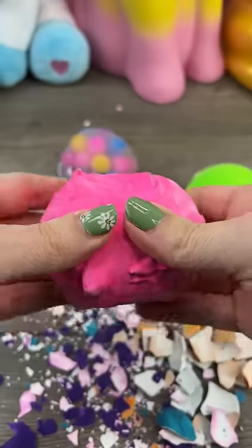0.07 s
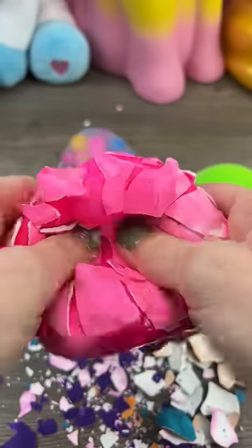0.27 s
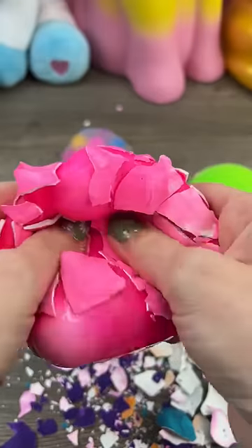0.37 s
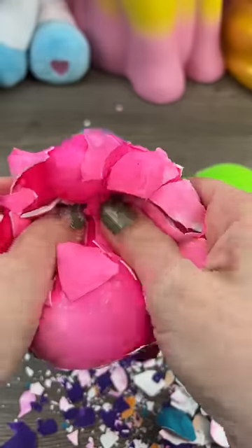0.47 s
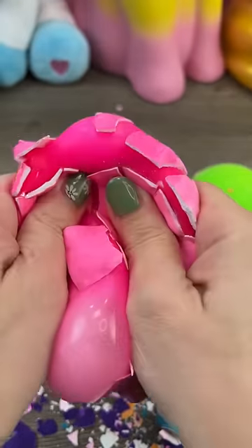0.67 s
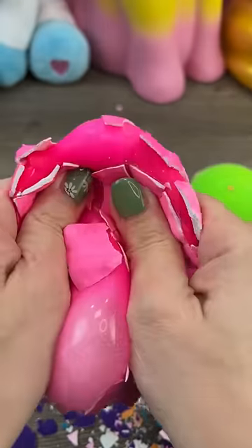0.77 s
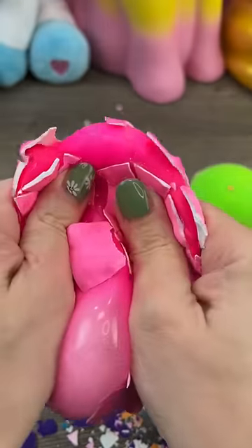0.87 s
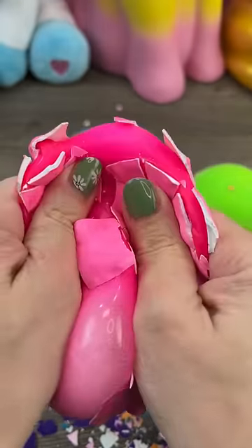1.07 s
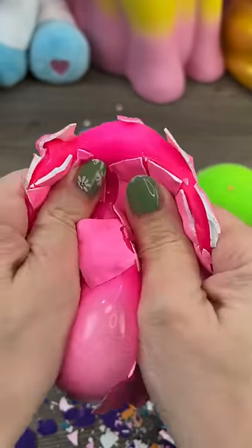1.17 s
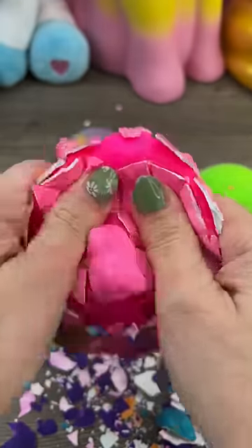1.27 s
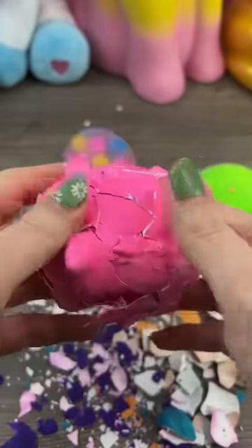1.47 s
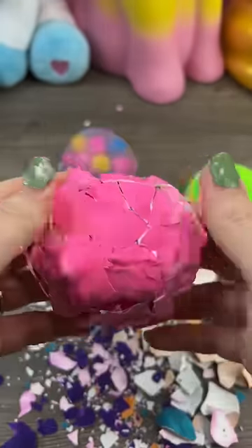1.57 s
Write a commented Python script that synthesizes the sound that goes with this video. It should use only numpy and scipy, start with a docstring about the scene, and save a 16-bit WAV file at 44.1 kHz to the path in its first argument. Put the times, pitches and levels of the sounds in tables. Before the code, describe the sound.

A brittle plaster shell is squeezed by hand, very close, in stereo. Faint snaps begin before 0.2 s; at about 0.24 s a loud, overloaded crack lands with a short hollow pop. Two tiny creaks follow at 0.3-0.4 s, then dense dry snaps and crunches from 0.45 to 0.95 s. It nearly hushes until 1.2 s, then soft rustling and a few lighter crackles, over faint low room rumble.

```python
"""Over a low room rumble and a changing rustle of flakes and fingers, a brittle plaster shell on a soft ball
is squeezed close to two microphones. Faint snaps lead to one loud crack and a hollow pop, then two creaks,
then many short snaps and ticks. Fractures and ticks are shaped noise that excites damped resonators,
the pop is a sum of damped sines, the rustle is noise gated by random grains, and the rumble is narrow-band
noise; a short noise tail adds the room's reverberation."""
import sys
import numpy as np
from scipy import signal
from scipy.io import wavfile

SR = 44100
rng = np.random.default_rng(int(sys.argv[2]) if len(sys.argv) > 2 else 0)


def to_wav(s):
    """Save 16-bit WAV."""
    ch = np.atleast_2d(s).T  # columns
    pcm = np.round(np.clip(ch, -1, 1) * 32767)  # PCM
    wavfile.write(sys.argv[1], SR, pcm.astype(np.int16))


N = 70560   # length of the scene in samples

BURST = 4096   # samples set aside for one fracture or tick
ALIKE = 0.75   # share of noise power common to both microphones
RUMBLE_SIDE, RUMBLE_LAG = 0.25, 0.3   # amplitude of each side's own noise; right phase lag (radians)
AIR_HZ = (7500, 16000)   # band of the treble hiss
FLAKE_HZ, FLAKE_CYCLES = (1300, 8300), 7.6   # range of flake pitches; t60 in cycles
GRAINS_PER_S, GRAIN_SPREAD_DB = 2800, 4.2   # rate of all flake sizes together; scale of random level excess
GRAIN_BED = 0.33   # amount of smooth hiss between grains
LEAD_S = 0.01   # the noise burst starts this long before the listed time and swells to its crest
RISE_SHARE, FALL_SHARE = 0.17, 0.47   # growth and decay time against the length of a fracture
SHARD_CYCLES, SNAP_HZ = 8.5, (7000, 19000)   # t60 of a shard in cycles; band of the snap
BROAD_DB, KNOCK_T60_S = -4.5, 0.017   # broad noise against the mean of shard and snap levels; knock ring
CREAK_HZ = 4220   # pitch of the slips in a creak
TICK_S, TICK_CYCLES = 0.0006, 7.0   # swell and decay time of a tick; t60 of its ring in cycles
TICK_HISS_DB = 1.5   # hiss of a tick against its ring
ROOM_T60_S, ROOM_DB, ROOM_CUT_HZ = 0.097, -14, 9000   # decay, level and upper edge of the room's tail
LOW_CUT_HZ, CUTOFF_HZ = 44, 16600   # high-pass corner; stop-band edge of the final low-pass


def amp(db):
    """Level to amplitude: 20 dB is a factor of ten."""
    return 10 ** (np.asarray(db) / 20)


def rms_one(x):
    """Scale to unit effective (root-mean-square) value."""
    return x / np.sqrt(np.mean(x ** 2) + 1e-20)


def top_one(x):
    """Scale until the peaks of the channels average one."""
    return x / np.abs(x).max(axis=-1).mean()


def band(x, low_hz, high_hz):
    """Band-pass filtering: only the spectrum between two edges is kept."""
    return signal.sosfilt(signal.butter(2, [low_hz, high_hz], "band", fs=SR, output="sos"), x)


def ring(x, hz, t60):
    """Damped resonator: a unit click starts a decaying sine of initial height one."""
    radius = amp(-60 / (t60 * SR))
    w = 2 * np.pi * hz / SR
    return signal.lfilter([0, np.sin(w)], [1, -2 * radius * np.cos(w), radius * radius], x)


def peak(x, hz, width_hz, db):
    """Resonant equalization: a bell-shaped lift or cut around one frequency."""
    w, g = 2 * np.pi * hz / SR, amp(db / 2)
    q = np.sin(w) * width_hz / hz / 2
    return signal.lfilter([1 + q * g, -2 * np.cos(w), 1 - q * g], [1 + q / g, -2 * np.cos(w), 1 - q / g], x)


def turn(x, hz, width_hz):
    """All-pass dispersion: phase turns a full cycle around hz, delaying that band at equal level."""
    w = 2 * np.pi * hz / SR
    q = np.sin(w) * width_hz / hz / 2
    return signal.lfilter([1 - q, -2 * np.cos(w), 1 + q], [1 + q, -2 * np.cos(w), 1 - q], x)


def pair(size):
    """Partial coherence: two noises share part of their power."""
    both, left, right = rng.standard_normal((3, size))
    return np.sqrt(ALIKE) * both + np.sqrt(1 - ALIKE) * np.array([left, right])


def rumble():
    """Resonance of noise: each band is filtered twice and is mostly coherent between the sides."""
    # low resonances of the room: centre f/Hz, width of each filter pass/Hz, level/dB
    resonances = [(57.46, 17.6, -42), (94.6, 20, -51), (173.8, 17, -55.5), (120, 70, -55)]
    out = 0
    for hz, width_hz, db in resonances:
        common = rng.standard_normal(N + SR)
        noise = common + RUMBLE_SIDE * rng.standard_normal((2, N + SR))
        edges = hz - width_hz / 2, hz + width_hz / 2
        settled = band(band(noise, *edges), *edges)[:, SR:]   # skip the filters' build-up
        out = out + amp(db) * rms_one(settled)
    return np.real(signal.hilbert(out) * np.exp([[0], [-1j * RUMBLE_LAG]]))


def grains(per_s):
    """Random impacts: uneven puffs whose power decays by 1/e in about 0.75 ms, over a faint bed."""
    hits = rng.random(N) < per_s / SR
    sizes = hits * amp(GRAIN_SPREAD_DB * np.minimum(rng.exponential(1, N), 4))
    bed_power = GRAIN_BED ** 2 * per_s / GRAINS_PER_S
    return np.sqrt(signal.lfilter([1], [1, -.97], sizes ** 2 + bed_power))


def rustle():
    """Granular excitation: flakes of ten sizes ring, and the same grains gate treble and bass hiss."""
    # loudness of flakes and fingers, interpolated: t/s, flake level/dB, treble level/dB, bass level/dB
    rustle_levels = [(0, -79, -76, -86), (0.122, -55.5, -59, -55), (0.203, -66, -80, -68.5),
                     (0.252, -29, -61, -33.5), (0.385, -61.5, -51.5, -59.5), (0.408, -58, -57, -56),
                     (.56, -37, -42.5, -71), (.68, -48, -51, -59.5), (0.899, -44.5, -60, -54),
                     (0.999, -59.5, -80.5, -86), (1.093, -75, -102, -107), (1.217, -41.5, -42.5, -46),
                     (1.293, -41, -38.5, -38.5), (1.39, -51, -41.5, -46), (1.46, -54.5, -67, -68),
                     (1.518, -57.5, -50.5, -54.5), (1.6, -60, -60, -51)]
    s, *levels = np.transpose(rustle_levels)
    puffs = [grains(GRAINS_PER_S / 10) for _ in range(10)]
    flakes = 0
    for puff, hz in zip(puffs, np.geomspace(*FLAKE_HZ, 10)):
        flakes = flakes + rms_one(ring(puff * pair(N), hz, FLAKE_CYCLES / hz))
    gate = np.sqrt(np.sum(np.square(puffs), axis=0))
    treble = band(gate * pair(N), *AIR_HZ)
    bass = band(gate * pair(N), 220, 720)
    t = np.arange(N) / SR
    return sum(amp(np.interp(t, s, db)) * rms_one(x) for db, x in zip(levels, [flakes, treble, bass]))


def cracks():
    """Brittle fracture: a noise burst gives a bright snap, a ringing shard, broad noise and a dull knock."""
    # fractures: t/s, shard f/Hz, shard level/dB, treble snap level/dB, dull knock level/dB, length scale/ms
    fractures = [(0.048, 3650, -27.5, -15, -34, 5.1), (0.115, 2800, -26, -22, -34.5, 8.3),
                 (0.2217, 2400, -24, -11, -27.5, 1.74), (0.2401, 1850, -5.5, 2.5, -8.5, 6.5),
                 (0.4239, 1180, -22.5, -25, -39, 4.2), (0.4655, 1235, -13, -10.5, -53, 7.46),
                 (0.5347, 1620, -16.5, -1.5, -36, 1.9), (0.544, 2020, -6, -3.5, -30, 3),
                 (0.5917, 5800, -0.5, -6.5, -68, 4.4), (0.7086, 2610, -12, -11, -36, 3.7),
                 (0.7162, 6000, -7.5, -0.5, -28, 2.4), (0.7354, 3110, -13, -12, -51, 4),
                 (0.7585, 2010, -7, -4, -48, 2.3), (0.7852, 2660, -9.5, -10, -31, 2.04),
                 (0.7946, 838, -16, -23.5, -37.5, 4.5), (0.8299, 3850, 0, -7.5, -16, 1.52),
                 (0.8336, 2340, -7.5, -12, -28, 3.6), (0.882, 2235, -19.5, -10.5, -39, 8.9),
                 (0.891, 1754, -11, -13.5, -46, 2.7), (0.9094, 4080, -15, -5, -23, 0.46),
                 (0.947, 924, -17, -36, -37, 1.27), (1.0071, 698, -43, -32.5, -36, 3.0),
                 (1.2768, 2030, -28.5, -14.5, -45, 6.3), (1.2976, 700, -20, -23, -25, 4.34),
                 (1.4243, 4780, -16.5, -11.5, -39, 5.2), (1.452, 4300, -17, -5, -24.5, 6.4),
                 (1.5679, 2510, -62, -14.5, -35.5, 6.9)]
    # hollow tones of the ball: f/Hz
    hollow_hz = (260, 440, 790)
    out, t = np.zeros((2, N + BURST)), np.arange(BURST) / SR
    for s, hz, shard_db, snap_db, knock_db, ms in fractures:
        x = 1000 * (t - LEAD_S) / ms - .4   # time from the crest, in lengths
        shape = np.exp(np.where(x < 0, x / RISE_SHARE, -x / FALL_SHARE))
        burst, other = pair(BURST) * shape, pair(BURST) * shape
        shard = ring(burst, hz, SHARD_CYCLES / hz)
        snap = band(burst, *SNAP_HZ)
        broad = band(other, 1000, 7500)
        dull = band(burst, 220, 1300)
        knock = sum(rng.uniform(0.94, 1) * ring(dull, tone_hz, KNOCK_T60_S) for tone_hz in hollow_hz)
        sound = amp(shard_db) * top_one(shard) + amp(snap_db) * top_one(snap)
        sound += amp((shard_db + snap_db) / 2 + BROAD_DB) * top_one(broad)
        sound += amp(knock_db) * top_one(knock)
        i = int((s - LEAD_S) * SR)
        out[:, i:i + BURST] += sound
    return out[:, :N]


def ticks():
    """Impulse excitation: noise puffs ring briefly; stick-slip creaks are even trains of the same ticks."""
    # small flakes snap off: t/s, f/Hz, level/dB
    flake_snaps = [(0.1001, 9400, -25.5), (.122, 2900, -33.5), (0.141, 11300, -19.5), (0.15, 4470, -24),
                   (0.296, 11500, -23.5), (0.304, 2600, -26), (.3925, 11600, -26), (0.4227, 11600, -26.5),
                   (0.5116, 1370, -23), (.542, 7000, -10.5), (0.6365, 4630, -16), (.648, 11100, -28),
                   (.657, 2600, -19), (.6765, 1570, -22), (.692, 11500, -29), (0.748, 2200, -36),
                   (0.7536, 2340, -21), (0.8466, 2000, -21), (0.8619, 2300, -18), (.8695, 2310, -20),
                   (.880, 3240, -17.5), (0.927, 2200, -27), (.943, 1580, -23), (0.9797, 1840, -34),
                   (1.159, 3800, -35.5), (1.289, 1990, -17.5), (1.317, 4700, -21.5), (1.395, 1900, -34),
                   (1.449, 5000, -24), (1.4008, 2030, -30), (1.583, 11500, -25.5)]
    # a split creeps on in even slips: start t/s, end t/s, spacing/s, mean level reached at the end/dB
    creeps = [(.308, .3395, .0068, -29), (.349, .3825, .0045, -22)]
    slips = []
    for start, end, gap_s, db in creeps:
        for s in np.arange(end, start, -gap_s):
            swell_db = 6 * (s - end) / (end - start)   # louder towards the end
            slips.append((s, CREAK_HZ, db + swell_db + rng.normal(0, 2)))
    out, t = np.zeros((2, N + BURST)), np.arange(BURST) / SR
    for s, hz, db in flake_snaps + slips:
        puff = pair(BURST) * t / TICK_S * np.exp(-t / TICK_S)
        hiss = band(puff, 1500, AIR_HZ[1])
        sound = top_one(ring(puff, hz, TICK_CYCLES / hz)) + amp(TICK_HISS_DB) * top_one(hiss)
        i = int((s - 2 * TICK_S) * SR)
        out[:, i:i + BURST] += amp(db) * sound
    return out[:, :N]


def pop():
    """Damped free vibration: low tones of the ball start softly and decay exponentially."""
    # thumps of the ball, strongest as the shell gives way: start t/s, f/Hz, level/dB, t60/s
    thumps = [(0.115, 184, -20, 0.057), (0.17, 310, -22, 0.018), (0.2446, 421, 17.5, 0.01),
              (0.25, 132, 2.5, 0.023), (.252, 68.5, 3, 0.051), (.255, 785, -21.5, 0.075)]
    out = np.zeros(N)
    for s, hz, db, t60 in thumps:
        t = np.maximum(np.arange(N) / SR - s, 0)
        soft_start = 1 - np.exp(-t * hz)
        out += amp(db - 60 * t / t60) * soft_start * -np.sin(2 * np.pi * hz * t)
    return out


def room(x):
    """Diffuse reverberation: convolution with a decaying noise tail, its own for each side."""
    t = np.arange(SR // 2) / SR
    noise = band(rng.standard_normal((2, len(t))), 290, ROOM_CUT_HZ)
    tail = noise * amp(-60 * t / ROOM_T60_S) * (t > .003)   # silent for the first 3 ms
    tail = tail / np.sqrt(np.sum(tail ** 2) / 2)
    return amp(ROOM_DB) * signal.fftconvolve(x, tail, axes=1)[:, :N]


def scene():
    """Superposition: near sounds, coloured and dispersed on the right, add to their room and the rumble."""
    # the right microphone hears brighter: centre f/Hz, width/Hz, lift/dB
    right_lift = (3214, 2250, 7.5)
    # phase turns of the right microphone: centre f/Hz, width/Hz
    right_phase = [(3600, 4570), (9000, 5400), (13000, 3300)]
    left, right = rustle() + cracks() + ticks()
    right = peak(right, *right_lift)
    for hz, width_hz in right_phase:
        right = turn(right, hz, width_hz)
    near = np.array([left, right]) + pop()
    return near + room(near) + rumble()


def record(dry):
    """Transducer response: microphone colour and low cut, then hard overload and a cut of the top."""
    # microphone colour: centre f/Hz, width/Hz, lift or cut/dB
    colour = [(2050, 900, 5), (10200, 1100, -13), (12000, 1500, 5), (13750, 800, -16)]
    for hz, width_hz, db in colour:
        dry = peak(dry, hz, width_hz, db)
    dry = signal.sosfilt(signal.butter(4, LOW_CUT_HZ, "high", fs=SR, output="sos"), dry)
    overloaded = np.clip(dry, -1, 1)
    return signal.sosfilt(signal.cheby2(16, 50, CUTOFF_HZ, fs=SR, output="sos"), overloaded)


dry = scene()
out = record(dry)
to_wav(out)
```